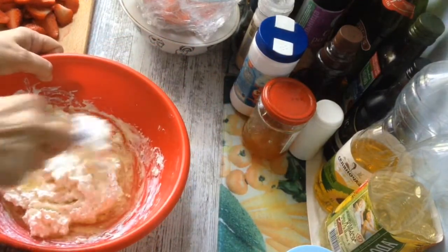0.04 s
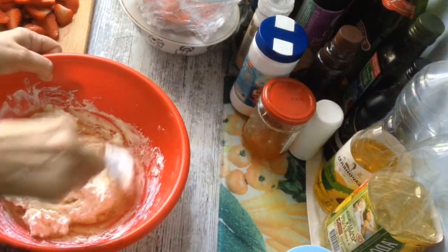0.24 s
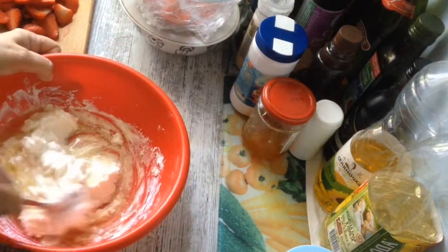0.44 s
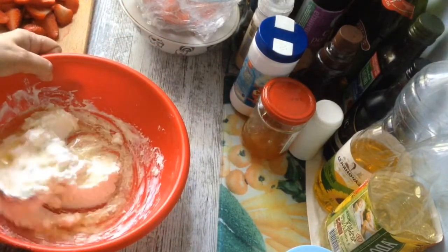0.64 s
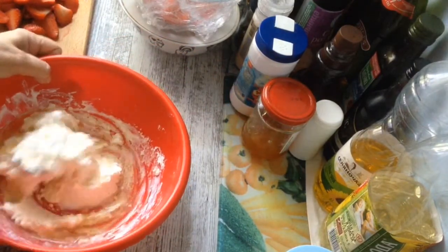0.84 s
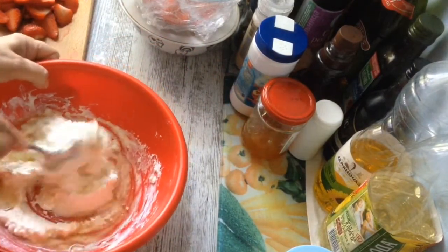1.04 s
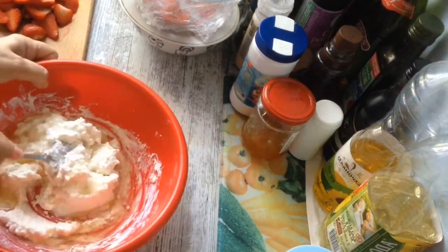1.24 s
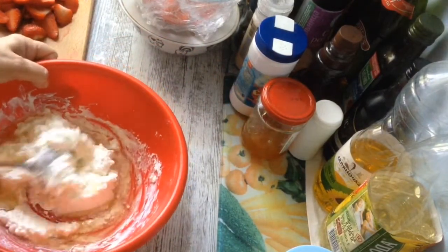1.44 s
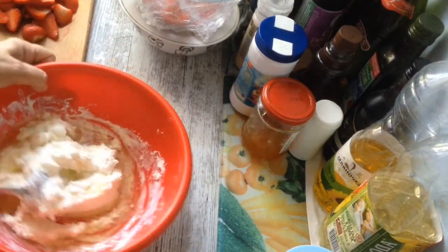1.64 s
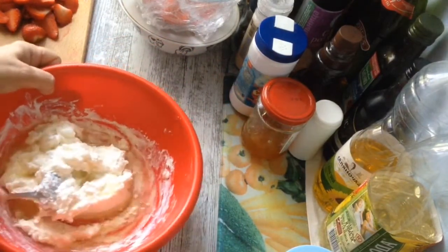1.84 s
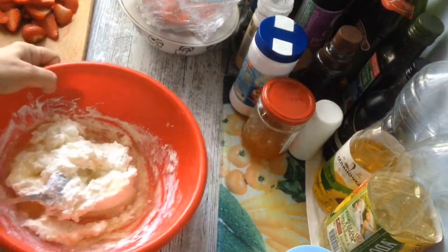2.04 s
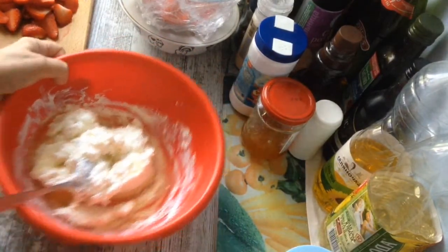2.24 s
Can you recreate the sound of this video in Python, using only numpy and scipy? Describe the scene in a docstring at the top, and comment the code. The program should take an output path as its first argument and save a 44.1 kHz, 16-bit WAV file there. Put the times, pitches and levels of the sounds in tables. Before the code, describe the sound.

A metal spoon stirs thick wet curd in a plastic bowl, squelching and knocking the wall

```python
"""A metal spoon stirs thick, wet cottage cheese in a plastic bowl on a kitchen worktop.
Over a faint, wavering hiss with rumble, curd squelches and the spoon rubs the plastic throughout;
air pockets smack, the bowl groans and torn films of whey fizz from the first strokes on.
Four knocks, near 0.2, 1.2, 1.7 and 2.0 s, ring bowl, worktop and room briefly; low thuds of the
shifting mass follow the first and the last. The microphone hears the sources direct and by the room."""
import sys
import numpy as np
from scipy import signal
from scipy.fft import rfft, irfft
from scipy.io import wavfile

SR = 44100
rng = np.random.default_rng(int(sys.argv[2]) if len(sys.argv) > 2 else 0)


def to_wav(sig):
    """Store sig (one row per channel, or 1-D mono) as 16-bit WAV at the path in sys.argv[1].

    Samples outside -1..1 are clipped; the rate is SR.
    """
    pcm = np.clip(np.atleast_2d(sig), -1, 1) * 32767
    pcm = np.round(pcm).astype(np.int16)
    wavfile.write(sys.argv[1], SR, pcm.T)  # frames by channels


N = 101429
T = np.arange(N) / SR   # time [s]


def from_db(db):
    """Decibels to gain."""
    return 10 ** (np.asarray(db) / 20)


def rms_one(x):
    """Scale to unit rms."""
    return x / np.sqrt(np.mean(x ** 2) + 1e-20)


def level(rows):
    """Gain over time from (time [s], level [dB]) points."""
    return from_db(np.interp(T, *np.transpose(rows)))


def at_hz(points, hz):
    """Read a table on a log-frequency axis."""
    f, v = np.transpose(points)
    return np.interp(np.log(np.maximum(hz, 1)), np.log(f), v)


def colour(x, points):
    """Weight the spectrum of a noise by (frequency [Hz], gain [dB]) points."""
    gain = from_db(at_hz(points, np.fft.rfftfreq(len(x), 1 / SR)))
    return irfft(rfft(x) * gain, len(x))


def click(s, db):
    """One impulse at a time [s]; the tiny constant is inaudible."""
    x = np.full(N, 1e-18)
    x[int(np.clip(s * SR, 0, N - 1))] = from_db(db)
    return x


def lowpass(x, hz, order):
    """Butterworth low-pass."""
    return signal.sosfilt(signal.butter(order, min(hz, SR / 2 - 1), fs=SR, output="sos"), x)


def resonate(x, hz, q):
    """Resonance with gain 1 on top."""
    return signal.lfilter(*signal.iirpeak(hz, q, fs=SR), x)


def bell(x, hz, db, q):
    """Raise a band by a resonance, or hollow it by the inverse."""
    b, a = signal.iirpeak(hz, q, fs=SR)
    b = a + (from_db(abs(db)) - 1) * b
    return signal.lfilter(b, a, x) if db > 0 else signal.lfilter(a, b, x)


def grains(per_s):
    """Tiny clicks at random times, of random sign and uneven size."""
    spread_db = 0.5
    sizes = from_db(spread_db * np.minimum(rng.exponential(1, N), 4))
    signs = rng.choice([-1, 1], N)
    return sizes * signs * (rng.random(N) < per_s / SR)


def hiss():
    """Background hiss and rumble: coloured noise whose level wavers slightly at random."""
    # spectrum: (frequency [Hz], gain [dB])
    hiss_spectrum = [(20, -3.5), (48, 9.5), (80, 12), (125, 16), (200, 8), (330, -0.5), (600, -4),
                     (1300, -12), (2000, -5.5), (2600, 1), (3500, -6), (5000, -1.5), (7500, -5), (10000, 1),
                     (13000, 0.5), (14200, -3), (15300, -2)]
    hiss_db, waver_db, waver_hz = -60, 1.47, 22   # middle level, rms waver, waver bandwidth
    waver = rms_one(lowpass(rng.standard_normal(N), waver_hz, order=2))
    noise = rms_one(colour(rng.standard_normal(N), hiss_spectrum))
    return from_db(hiss_db + waver_db * waver) * noise


def squelch():
    """Fine wet crackle of the curd: dense random clicks, coloured and swelling with the strokes."""
    # strength of the squelching, relative to the rubbing: (time [s], level [dB])
    squelch_level = [(0, -66.5), (0.16, -78), (0.36, -60.5), (0.45, -60), (0.51, -64.5), (0.61, -56),
                     (0.68, -70.5), (0.76, -70), (0.84, -61), (0.91, -66), (0.98, -59.5), (1.1, -69.5),
                     (1.38, -68), (1.53, -72.5), (1.72, -50), (1.82, -67.5), (1.92, -63.5), (2.13, -54.5),
                     (2.3, -55)]
    # spectrum of the wet curd: (frequency [Hz], gain [dB])
    curd_spectrum = [(300, -1.5), (700, -5), (1200, -5.5), (2000, -0.5), (3200, -1.5), (5000, -12.5),
                     (7500, -24), (15000, -23.5)]
    grains_per_s = 1400
    return level(squelch_level) * rms_one(colour(grains(grains_per_s), curd_spectrum))


def rub():
    """Spoon rubbing along the wall: tiny random slips excite resonances of the plastic."""
    # strength of the rubbing, relative to the squelching: (time [s], level [dB])
    rub_level = [(0, -88.5), (0.3, -63), (0.41, -69), (0.5, -65), (0.58, -61.5), (0.65, -58), (0.76, -84),
                 (0.9, -69.5), (0.99, -63), (1.08, -78), (1.56, -93), (1.65, -53), (1.9, -79.5), (2.1, -60),
                 (2.3, -57)]
    # resonances of the rubbed wall: (frequency [Hz], level [dB], Q [-])
    rub_modes = [(221, 4, 4.7), (335, -4, 11), (714, -1, 13), (1213, 0.5, 10.2)]
    slips_per_s = 2100
    slips = grains(slips_per_s)
    scrape = sum(from_db(db) * resonate(slips, hz, q) for hz, db, q in rub_modes)
    return level(rub_level) * rms_one(scrape)


def smacks():
    """Air pockets pop: each swells and rings for a few cycles."""
    # wet smacks as air pockets open: (time [s], impulse level [dB], frequency [Hz])
    smack_rows = [(0.083, -9.5, 740), (0.183, -13.5, 4360), (0.365, -21, 4970), (0.405, -9, 688),
                  (0.578, -11, 1160), (0.613, -1.5, 730), (0.616, -11, 1268), (0.659, -6, 677),
                  (0.803, -25, 4785), (0.814, -25, 4630), (0.836, -17.5, 1760), (0.85, -19, 2480),
                  (0.974, -17, 1210), (1.386, -32.5, 4930), (1.583, -18, 3780), (1.591, -21.5, 4350),
                  (1.807, -16.5, 2900)]
    ring_q, swell_q = 10.5, 0.67
    return sum(resonate(resonate(click(s, db), hz, ring_q), hz, swell_q) for s, db, hz in smack_rows)


def groans():
    """Stick and slip of the spoon keeps a low mode of the bowl sounding, sagging in pitch."""
    # groans of the dragged bowl: (centre time [s], length as Gaussian sigma [s],
    # pitch at the centre before jitter [Hz], level before roughness [dB])
    groan_rows = [(0.087, 0.0091, 204.5, -50.5), (0.68, 0.046, 243, -60.5), (0.99, 0.0242, 243, -53),
                  (1.77, 0.046, 219, -52.5), (2.17, 0.0417, 210.8, -54.5)]
    sag_hz_per_s, jitter_hz, roughness = 90, 10.2, 0.54   # jitter and roughness are rms
    jitter, rough = (rms_one(lowpass(v, 35.3, order=2)) for v in rng.standard_normal((2, N)))
    out = 0
    for s, length, hz, db in groan_rows:
        pitch = hz - sag_hz_per_s * (T - s) + jitter_hz * jitter
        swell = from_db(db) * np.exp(-.5 * ((T - s) / length) ** 2)
        out = out + swell * np.sin(2 * np.pi * np.cumsum(pitch) / SR)
    return out * (1 + roughness * rough)


def fizz():
    """Thin films of whey tear in brief swarms of very fine, high clicks."""
    # swarms: (centre time [s], peak level [dB], length as Gaussian sigma [s])
    swarms = [(0.192, -51, 0.0073), (0.563, -59, .015), (0.652, -58, 0.049), (0.808, -56.5, 0.014),
              (0.898, -58, 0.0074), (1.004, -63, 0.018), (1.076, -65, 0.0097), (1.377, -58.5, .006)]
    # spectrum of the fizz: (frequency [Hz], gain [dB])
    fizz_spectrum = [(2000, -11), (5000, -8.5), (7500, -13), (10500, -6), (13000, -7.5), (15000, -8.5)]
    clicks_per_s = 1300
    swell = sum(from_db(db) * np.exp(-.5 * ((T - s) / length) ** 2) for s, db, length in swarms)
    return swell * rms_one(colour(grains(clicks_per_s), fizz_spectrum))


def knocks():
    """Each knock and rebound rings the bowl; returns direct sound, room feed and worktop feed."""
    # spoon knocks on the wall: (time [s], level [dB], thump [dB], wall ring [Hz], ring gain [dB],
    # overtone [Hz], overtone gain [dB], dull band [Hz], dull band gain [dB], contact cut-off [Hz],
    # rebound delay [s], rebound [dB], room feed [dB], worktop feed [dB])
    knock_rows = [(0.1998, 8, 11.5, 740, 6, 1805, 8, 2700, -6, 4444, 0.0028, -23, -1.5, 6),
                  (1.1766, 5.5, -2, 700, 5, 2340, 7, 3330, -7.5, 3348, 0.00096, -19.5, -3.5, 3.5),
                  (1.6587, -3.5, -6.5, 1370, 8.5, 1580, 6, 970, 4.5, 2037, 0.002856, -6, -2, 6.5),
                  (1.9636, 8.5, -22, 1121, 18.5, 2040, 10, 604, -11, 4096, 0.0022, -11, -2, 5)]
    thump_hz, ring_q, overtone_q, dull_q = 280, 10.2, 10.4, 6.6
    crack_db = -35   # unmuffled share of each contact
    room_share = 0.76   # the room mixes all directions, which evens out overtone and dull band
    direct = room = table = crack = 0
    for (s, db, thump_db, ring_hz, ring_db, over_hz, over_db, dull_hz, dull_db, cut_hz,
         rebound_s, rebound_db, room_db, table_db) in knock_rows:
        tap = click(s, db) + click(s + rebound_s, db + rebound_db)
        force = tap + from_db(thump_db) * lowpass(tap, thump_hz, order=1)
        force = lowpass(bell(force, ring_hz, ring_db, ring_q), cut_hz, order=5)
        near = bell(force, over_hz, over_db, overtone_q)
        near = bell(near, dull_hz, dull_db, dull_q)
        spread = bell(force, over_hz, room_share * over_db, overtone_q)
        spread = bell(spread, dull_hz, room_share * dull_db, dull_q)
        direct = direct + near
        crack = crack + from_db(crack_db) * tap
        room = room + from_db(room_db) * spread
        table = table + from_db(table_db) * spread
    return bowl(direct) + crack, bowl(room) + crack, table


def bowl(force):
    """Heavily damped modes of the loaded bowl, summed with alternating sign."""
    # modes: (frequency [Hz], level [dB], Q [-])
    bowl_modes = [(214, -1.5, 2.5), (447, 1, 3.9), (789, -0.5, 3.12), (1238, 1.5, 7.6), (1434, -2.5, 4.2),
                  (1727, 0.5, 5.1), (2160, 2, 4.8), (2450, 2, 4.68), (2864, 4, 21), (3360, 0.5, 30),
                  (3740, -4, 10.6), (4570, -6.5, 10.4), (5200, -8.5, 10.2)]
    return sum((-1) ** k * from_db(db) * resonate(force, hz, q)
               for k, (hz, db, q) in enumerate(bowl_modes))


def worktop(x):
    """Longer ringing of bowl, worktop and the things on it: decaying cosines of alternating sign."""
    # modes: (frequency [Hz], level relative to the other modes [dB], decay by 60 dB [s])
    worktop_modes = [(126.64, -52, .33), (218, -47.5, 0.29), (239.2, -51.5, 0.31), (338.3, -54.5, 0.29),
                     (435, -71.5, 0.3), (586, -57, 0.31), (699, -68, 0.43), (827, -53, 0.23),
                     (866, -63, 0.43), (1197, -59, 0.13), (1214, -72, .3)]
    out = 0
    for k, (hz, db, t60) in enumerate(worktop_modes):
        r = np.exp(-np.log(1000) / (t60 * SR))   # decay per sample
        w = 2 * np.pi * hz / SR
        ring = signal.lfilter([1, -r * np.cos(w)], [1, -2 * r * np.cos(w), r * r], x)
        out = out + (-1) ** k * from_db(db) * ring
    return from_db(-3) * out


def kitchen(x):
    """Diffuse reflections that build up quickly and die band by band."""
    # decay by 60 dB: (frequency [Hz], time [s])
    room_t60 = [(100, 0.55), (300, 0.26), (1000, 0.33), (2500, .31), (5000, 0.3), (12000, 0.6)]
    # strength of the reflections: (frequency [Hz], gain [dB])
    room_colour = [(40, 18), (80, -9), (170, -10), (300, 5), (600, -2.5), (1100, 0.5), (2200, 4),
                   (3200, 1.5), (5000, 7), (15000, 1)]
    # time constant of the build-up: (frequency [Hz], time [s])
    room_build = [(100, 0.011), (400, 0.0038), (1200, 0.0081), (4000, 0.0014)]
    gap_s = 0.0016   # silence before the first reflection
    t = T[:SR // 2]
    hz = np.fft.rfftfreq(len(t), 1 / SR)
    white = rfft(rng.standard_normal(len(t)))
    edges, tail = np.geomspace(25, 20000, 21), 0
    for low, high in zip(edges, edges[1:]):
        centre = np.sqrt(low * high)
        onset = 1 - np.exp(-np.maximum(t - gap_s, 0) / at_hz(room_build, centre))
        decay = from_db(-60 * t / at_hz(room_t60, centre))
        band = irfft(white * ((hz >= low) & (hz < high)), len(t)) * onset * decay
        # energy in proportion to bandwidth, before the room's colour
        even = np.sqrt(2 * (high - low) / SR / np.sum(band ** 2))
        tail = tail + band * even * from_db(at_hz(room_colour, centre))
    return signal.fftconvolve(x, tail)[:N]


def bumps():
    """Soft low thuds as the heavy mass shifts: low-passed impulses without the deepest bass."""
    # dull pushes of the curd against the bowl: (time [s], impulse level [dB], cut-off [Hz])
    bump_rows = [(0.226, 6.5, 192), (0.264, 9, 123), (2.059, 2.5, 134), (2.097, -2, 123.4)]
    x = sum(lowpass(click(s, db), hz, order=3) for s, db, hz in bump_rows)
    return signal.sosfilt(signal.butter(2, 65, "high", fs=SR, output="sos"), x)


def scene():
    """All sources direct at the microphone, with worktop, room and hiss."""
    stir = from_db(-3.5) * (squelch() + rub())
    smack, bump = smacks(), bumps()
    knock, to_room, to_table = knocks()
    bump_room_db, smack_room_db, stir_room_db, bump_table_db = 1.5, -7.5, -13.5, 6.5
    to_room = to_room + from_db(bump_room_db) * bump
    to_room = to_room + from_db(smack_room_db) * smack + from_db(stir_room_db) * stir
    table = worktop(to_table + from_db(bump_table_db) * bump)
    direct = knock + bump + smack + stir + groans() + fizz()
    return (direct + kitchen(to_room) + table + hiss())[None]


def record(dry):
    """A steep elliptic low-pass ends the treble at 15350 Hz."""
    return signal.sosfilt(signal.ellip(12, .1, 70, 15350, fs=SR, output="sos"), dry)


dry = scene()
out = record(dry)
to_wav(out)
```